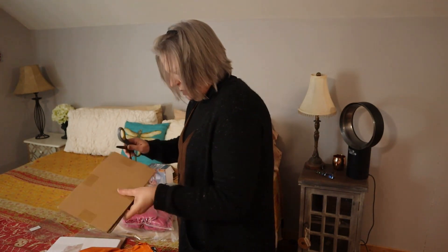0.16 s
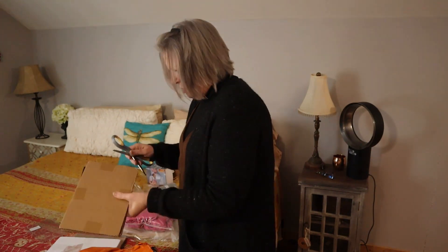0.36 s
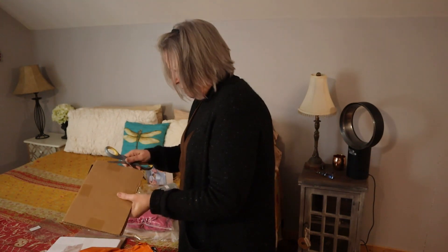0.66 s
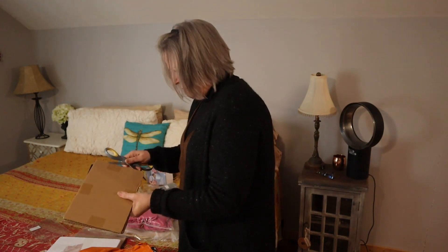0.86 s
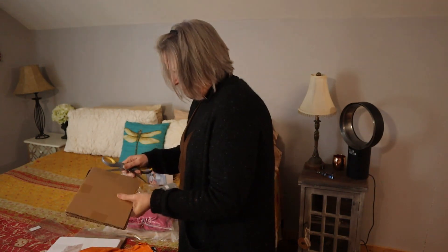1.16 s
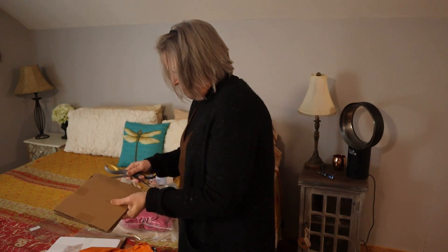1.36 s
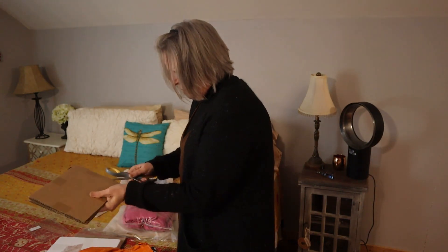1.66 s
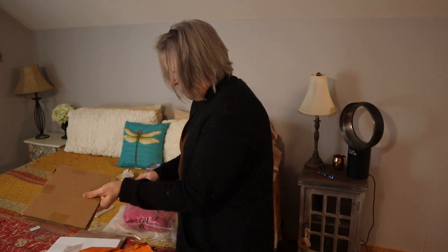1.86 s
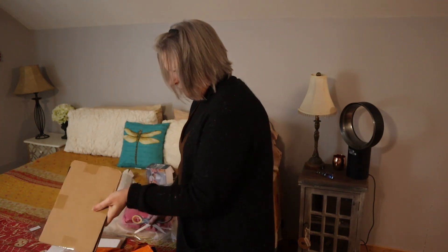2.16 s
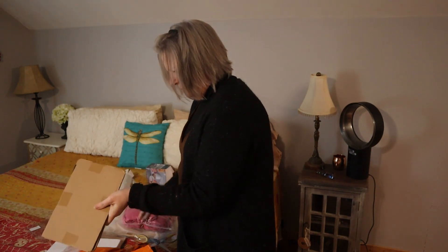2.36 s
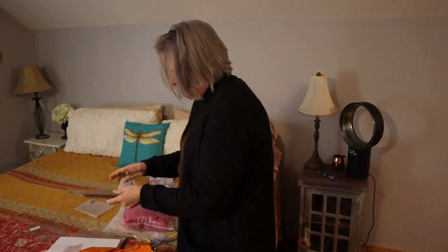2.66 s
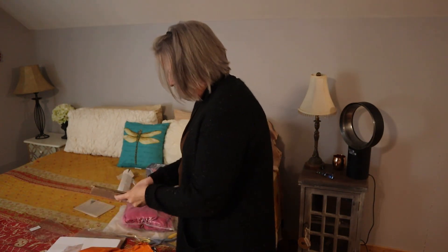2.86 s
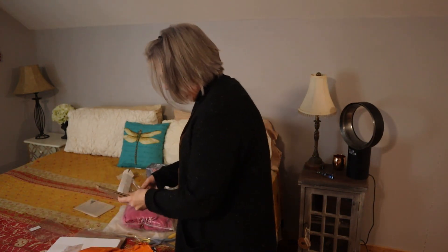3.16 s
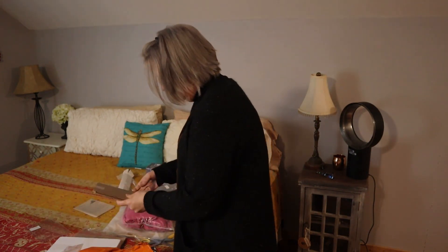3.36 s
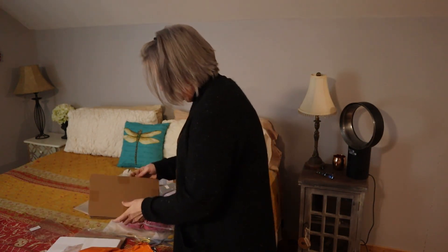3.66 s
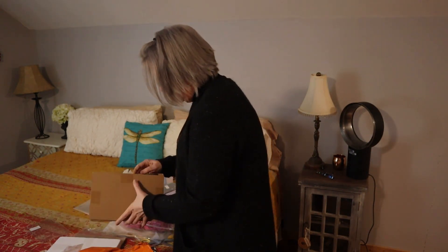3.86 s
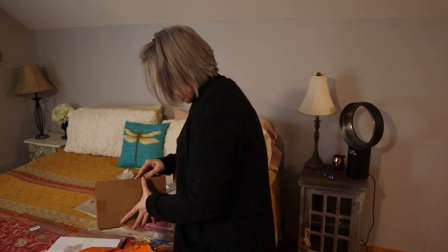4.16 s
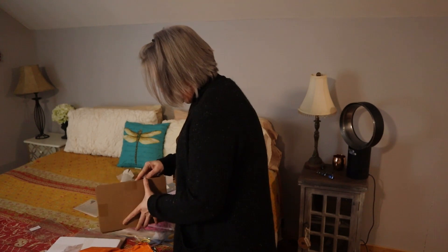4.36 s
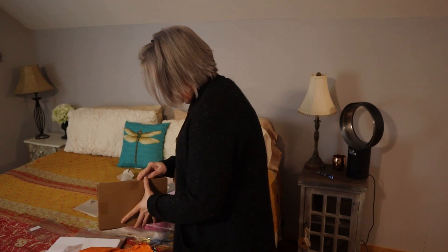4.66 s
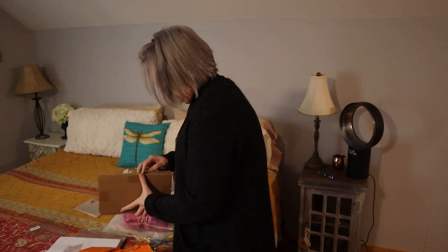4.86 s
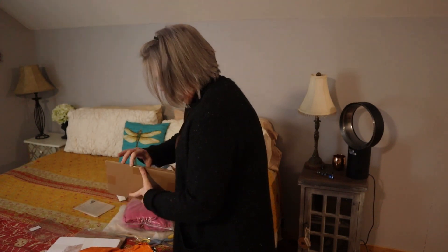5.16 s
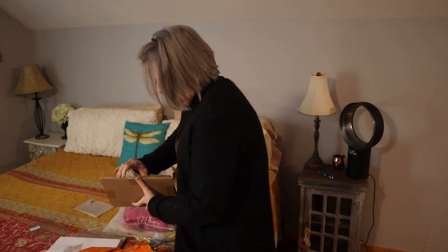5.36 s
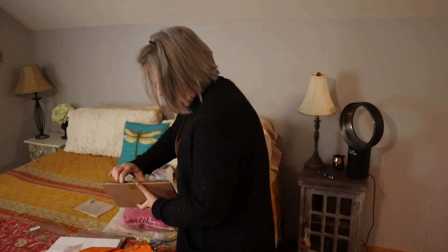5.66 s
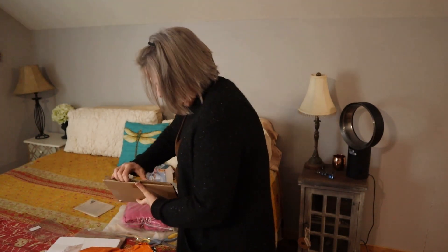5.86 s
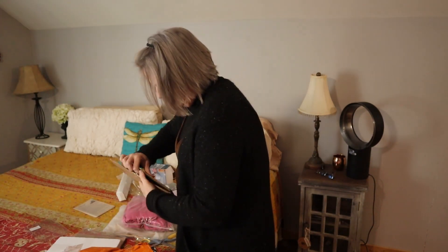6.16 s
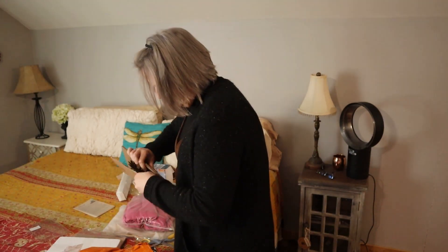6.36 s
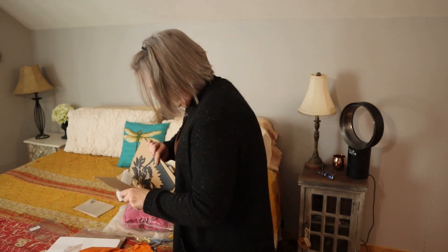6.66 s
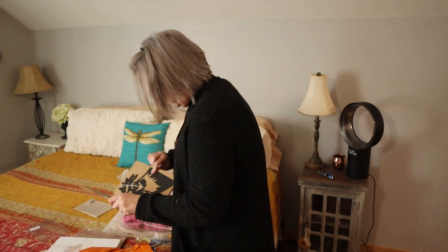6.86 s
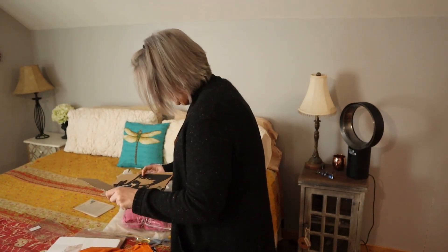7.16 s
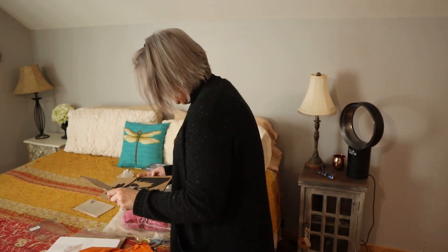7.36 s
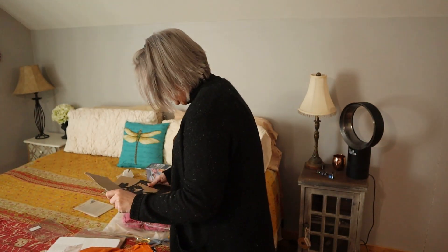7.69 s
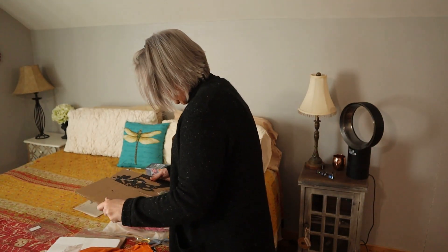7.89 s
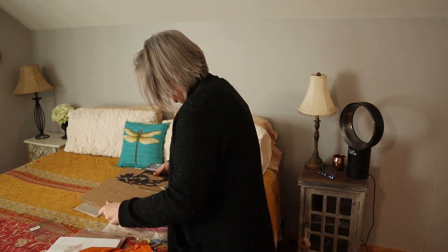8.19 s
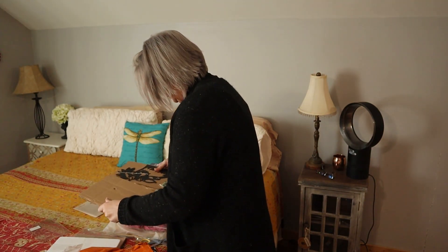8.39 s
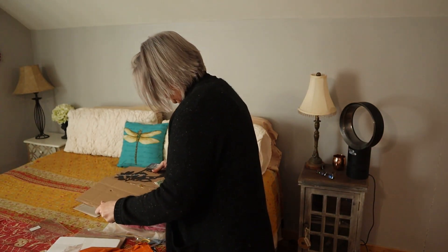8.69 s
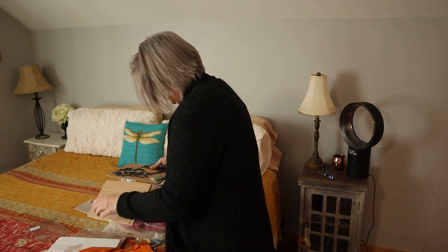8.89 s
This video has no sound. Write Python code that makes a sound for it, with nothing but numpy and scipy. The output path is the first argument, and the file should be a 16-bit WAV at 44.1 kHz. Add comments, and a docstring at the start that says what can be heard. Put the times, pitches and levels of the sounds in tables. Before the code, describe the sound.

Hands handle a flat cardboard mailer in a quiet bedroom, with faint rubbing, small crisp clicks and edge bumps, then two loud flap pops.

```python
"""In a bedroom, hands work at a flat cardboard mailer and open it.
Sliding hands hiss and set off small ticks, strokes rasp, fingertips skim in narrow bands, creases snap,
edges bump and drag, and two flaps pop open and rebound. Contacts are shaped noise; panels are ringing modes.
The room answers every contact over a quiet room tone; a camera with two close microphones limits the peaks."""
import sys
import numpy as np
from scipy import signal
from scipy.fft import rfft, irfft, next_fast_len
from scipy.io import wavfile
from scipy.ndimage import uniform_filter1d, map_coordinates

SR = 44100
rng = np.random.default_rng(int(sys.argv[2]) if len(sys.argv) > 2 else 0)


def generate_wav(signal):
    """Clip the signal to [-1, 1] and save it as 16-bit WAV at the path in sys.argv[1]."""
    frames = np.transpose(np.atleast_2d(signal))
    scaled = np.clip(frames, -1, 1) * 32767
    pcm = np.round(scaled).astype(np.int16)
    wavfile.write(sys.argv[1], SR, pcm)


N = 398223

# Every event level is set before its layer's trim, the room and the limiter.
# Room tone and microphone hiss, relative spectrum: [hz, density_db]
TONE_SPECTRUM = [(15, -25), (30, -6), (45, 2), (60, 0.5), (80, -5), (120, -3), (220, -5), (500, -6.5),
                 (1000, -12), (2000, -15), (4000, -17), (10000, -20), (16000, -23)]
# Left-right likeness of the room tone: [hz, correlation]
TONE_ALIKE = [(60, 1), (150, 0.77), (400, 0.38), (1000, 0.28), (4000, 0.34), (14000, 0.19)]
# Hands sliding over the board, swelling and easing off: [start_s, peak_s, end_s, peak_level_db]
SLIDE_EVENTS = [(0, 0.104, .42, -41), (1.25, 1.74, 1.95, -37), (3.2, 3.403, 4.1, -41.5),
                (3.64, 3.94, 4.08, -34.5), (4.83, 4.895, 5.35, -36), (5.43, 5.815, 6.53, -42),
                (6.1, 6.24, 6.56, -40.5), (7.22, 7.41, 7.48, -44), (7.7, 7.818, 8.43, -40),
                (8.82, 8.9, 8.9, -42)]
# Slide hiss from the skin of the board, relative spectrum: [hz, density_db]
HISS_SPECTRUM = [(500, -33), (1500, -18), (2500, -2.5), (4000, 3.5), (5500, 6.5), (7800, 4), (10000, 1),
                 (12500, -5.5), (16000, -4)]
# Slide rasp in the panel, relative spectrum: [hz, density_db]
RASP_SPECTRUM = [(100, -10), (280, -4.5), (450, 7.5), (750, 0), (1350, 5.5), (2200, 3.5), (4000, -8.5),
                 (9000, -51)]
# Short strokes of board on board or skin: [middle_s, length_s, level_db, body_re_rasp_db]
SCUFF_EVENTS = [(.132, 0.044, -42, -13), (.235, 0.041, -46, -10), (.323, 0.014, -33, -2),
                (.976, .014, -51.5, -7), (1.212, 0.0069, -25, -12), (1.321, 0.0077, -32, -18),
                (1.519, 0.012, -23.5, -1), (1.695, 0.0097, -23, -5.5), (1.79, 0.043, -23.5, -9),
                (2.518, 0.037, -29, 7.5), (3.44, 0.042, -36.5, -18), (3.515, 0.029, -32.5, -14),
                (3.694, 0.056, -33.5, -2), (3.752, 0.044, -32, -4.5), (4.49, 0.038, -42, -6),
                (4.941, 0.016, -34, -6), (5.341, 0.057, -36, 1), (5.753, 0.023, -34, -12),
                (5.921, 0.024, -31.5, -12), (6.125, 0.081, -34, 1), (6.615, 0.052, -17.5, 8),
                (6.672, 0.075, -19.5, 6), (6.786, 0.014, -30.5, 22), (6.86, 0.067, -37, 18),
                (6.925, 0.029, -18.5, -3), (7.009, 0.02, -31, -19), (7.681, 0.087, -38, -8),
                (7.86, 0.046, -43.5, 19), (7.991, 0.015, -39.5, 9), (8.108, 0.049, -34, -24),
                (8.447, 0.031, -27.5, -14), (8.556, 0.079, -32, -20), (8.872, 0.069, -32.5, -13)]
# Creases or fingernails snapping: [start_s, level_db, crack_hz, body_re_crack_db]
SNAP_EVENTS = [(.306, -35, 5370, -8), (1.9578, -38.5, 4420, -4), (2.8419, -41.5, 4900, -12),
               (3.0658, -44, 5200, -1), (3.2731, -29.5, 3800, -34), (3.3175, -22, 5740, -26),
               (3.4353, -25, 4470, -9.5), (4.0163, -28.5, 6000, -12), (4.0277, -29, 6360, -15),
               (4.1472, -37, 5570, -28), (4.2372, -25.5, 5500, -56), (4.8512, -34.5, 6750, -12),
               (4.936, -26, 5100, -11), (4.965, -24, 5400, -17), (5.043, -31, 6940, -7),
               (5.1144, -32, 6660, -28), (5.195, -33, 7840, -20), (5.2993, -30, 6030, -2),
               (5.3148, -19.5, 8100, -20), (5.335, -18.5, 7650, -5), (5.5858, -33.5, 5940, -23),
               (6.0576, -17.5, 6340, -12), (6.0637, -18.5, 7000, -3.5), (6.1142, -25, 4860, -19),
               (6.3986, -33.5, 5440, -7), (6.5178, -33, 6600, -32), (7.0107, -21.5, 5000, -26),
               (7.069, -37, 4320, -20), (7.12, -39, 7020, -32), (7.2314, -30.5, 4870, -31),
               (7.278, -36.5, 4430, -17), (7.329, -35, 5900, -20), (7.6646, -27.5, 5630, -27),
               (7.752, -30, 7500, -37), (7.7744, -29.5, 6640, -25), (7.7966, -23.5, 5800, -18),
               (7.9289, -32.5, 5800, -21), (8.0386, -31.5, 5170, -32), (8.2085, -35.5, 5550, -16),
               (8.3317, -38.5, 6760, -2), (8.868, -22.5, 6100, -16), (8.9226, -30.5, 4970, -6),
               (8.9897, -34.5, 6200, -5.5)]
# Edges that bump, ring the panel and drag on:
# [start_s, snap_db, body_re_crack_db, drag_db, drag_length_s, ring_db, best_excited_hz]
BUMP_EVENTS = [(1.5284, -20.5, -4, -27, .033, -19, 490), (1.6075, -17.5, -8.5, -18.5, .012, -17.5, 484),
               (1.735, -30, -7.5, -18, 0.022, -21, 525), (1.8115, -17, -8, -25.5, 0.014, -20, 1500),
               (2.431, -36, 5, -33, .016, -27, 140), (3.5346, -21, -4.5, -26.5, 0.008, -12.5, 1170),
               (7.817, -28, 4, -28, .028, -16, 327), (8.4634, -18, -8.5, -28, 0.024, -31.5, 192)]
# Soft pushes on a panel, without a snap: [start_s, level_db, best_excited_hz]
KNOCK_EVENTS = [(2.511, -30.5, 141), (3.695, -25, 1050), (3.753, -23.5, 1100), (7.798, -23.5, 380)]
# Ringing modes of the panel: [mode_hz, level_db, t60_s]
PANEL_MODES = [(72, -5, 0.071), (174.6, -1, 0.032), (245, -27, 0.054), (325.4, -0.5, 0.17),
               (388, -5.5, 0.15), (429, -4, 0.11), (446, 5, 0.091), (536, 7, 0.057), (560, 0, 0.069),
               (700, -6, 0.041), (899, 11, 0.053), (1048, 9, 0.07), (1182, -20, 0.03), (1420, -1, 0.07),
               (1407, 25, 0.024), (1940, -1, .06)]
# A fingertip or nail skimming the board: [middle_s, length_s, level_db, centre_hz]
SKIM_EVENTS = [(3.989, 0.056, -33.5, 6600), (4.063, 0.1, -32, 6900), (5.527, 0.052, -43.5, 4870),
               (5.706, 0.025, -41, 5100), (5.924, 0.018, -26.5, 6100), (7.382, 0.12, -46, 6980),
               (7.448, 0.043, -31.5, 7300), (7.991, 0.029, -33, 5370), (8.11, 0.039, -34, 7750)]
# Flaps popping open: [start_s, snap_db, body_re_crack_db, rebound_db, boom_db, boom_hz, thud_db]
FLAP_EVENTS = [(6.5726, 3.5, 6.5, 6.5, 3, 720, -21), (6.8687, -3, 7, -7, 5, 450, -6.5)]
# Left-right likeness of the room's diffuse tail: [hz, correlation]
ROOM_LIKENESS = [(100, 1), (400, 0.4), (1000, 0.19), (4000, 0.83), (12000, 0.12)]
# Decay of the diffuse tail: [hz, t60_s]
ROOM_DECAY = [(100, 0.21), (400, 0.28), (1000, 0.4), (3000, 0.37), (7000, .4), (14000, 0.18)]
# Tone colour of the whole room answer: [hz, gain_db]
ROOM_COLOUR = [(100, 4.5), (400, 1.5), (1000, 1.5), (3000, -0.5), (7000, -0.5), (11000, 5), (15000, 1.5)]
# Phase by which the left microphone is ahead of the right: [hz, phase_rad]
LEFT_LEAD = [(0, 1), (1400, 0.07), (3800, 1.13), (5200, 0.73), (7000, 1.08), (8600, 0.72), (11000, 4),
             (16000, 3.5)]

ROOM_TONE_DB = -49.5  # rms
RISE_DB, EASE_DB, SLIDE_FADE_S = 7.5, 8.5, 0.0033  # start and end under the peak; touch-down and lift-off fade
TICKS_PER_S, TICK_DB, TICK_SCATTER_DB = 4, 2, 4  # average rate; level re the slide's level; plus or minus
TICK_HZ, TICK_BODY_DB, TICK_TOP_DB = 5700, -15, -45  # crack centre; body re crack; loudest tick
RASP_HZ, RASP_SCATTER = 6370, 0.01  # crack centre of the strokes; relative change from stroke to stroke
MIDDLE_DB, MIDDLE_GROWS = -3.5, 0.45  # stiff middle re crack; how it follows the body (dB per dB)
BUMP_HZ = 5600  # crack centre
DRAG_BODY_DB, DRAG_PEAK = -0.5, .3  # drag body over snap body; peaks this share of its length after the bump
FLAP_HZ = 5200  # crack centre
REBOUND_S, REBOUND_HZ = .013, 5400  # delay; crack centre
REBOUND_BODY_DB, REBOUND_BOOM_DB = -2, -9  # body re crack; boom re the first boom
THUD_HZ = 172  # the whole box moves with the flap
ATTACK_S, TOP_HZ = .0015, 16000  # time constant of the limiter's ducking; upper band edge


def amp(db):
    """Decibels to gain."""
    return 10 ** (np.asarray(db) / 20)


def unit(x):
    """x at rms 1."""
    return x / np.sqrt(np.mean(x ** 2) + 1e-20)


def along(points, hz):
    """(Hz, value) points read on a log frequency axis."""
    f, v = np.transpose(points)
    return np.interp(np.log(hz + 1), np.log(f + 1), v)


def wobble(rate, n):
    """A smooth random curve, rate knots a second."""
    knots = rng.standard_normal(int(N * rate / SR) + 4)
    return map_coordinates(knots, [np.arange(n) * rate / SR])


def filtered(x, response):
    """x times a complex response of frequency, padded so that the ends stay apart."""
    n = x.shape[-1]
    m = next_fast_len(n + 8192)
    return irfft(rfft(x, m) * response(np.fft.rfftfreq(m, 1 / SR)), m)[..., :n]


def coloured(x, points, size=2048):
    """x through a causal minimum-phase filter with the given (Hz, dB) points."""
    cepstrum = irfft(np.log(amp(along(points, np.fft.rfftfreq(size, 1 / SR)))))
    # folding the cepstrum forward puts the energy as early as possible
    cepstrum[1:size // 2] *= 2
    cepstrum[size // 2 + 1:] = 0
    impulse = irfft(np.exp(rfft(cepstrum)))
    return signal.fftconvolve(x, impulse)[:len(x)]


def add(track, s, sound):
    """Mix a sound into a track from time s on."""
    i = max(0, round(s * SR))
    part = track[..., i:i + sound.shape[-1]]
    part += sound[..., :part.shape[-1]]


def noise_pair(n, alike):
    """Left and right noise with a likeness that depends on frequency, mixed from mid and side."""
    def balance(hz):
        turn = np.arccos(np.clip(along(alike, hz), -1, 1)) / 2
        return np.array([np.cos(turn), np.sin(turn)])

    mid, side = filtered(rng.standard_normal((2, n)), balance)
    return np.array([mid + side, mid - side])


def friction(n, rate, spread_db, smooth):
    """Fibres catch and let go: tiny slips of uneven size on a smooth hiss."""
    chance, size = rng.random(n), rng.exponential(size=n)
    sign, hiss = rng.choice([-1, 1], n), rng.standard_normal(n)
    slips = (chance < rate / SR) * sign * amp(spread_db * np.minimum(size, 4))
    return unit(unit(slips) + smooth * hiss)


def board(crack_hz, hollow_db):
    """Contact spectrum: crack of the paper skin over a hollow body and a stiff middle that grow together."""
    crack_hz = np.clip(crack_hz, 3200, 8000)
    middle_db = MIDDLE_DB + MIDDLE_GROWS * hollow_db
    bright_db = 14 * np.log2(crack_hz / 6000)  # a finer crack reaches further up
    body = [(40, hollow_db - 34), (130, hollow_db - 18), (220, hollow_db - 10),
            (340, hollow_db - 5), (680, hollow_db)]
    middle = [(1000, middle_db + .5), (2100, middle_db + .5)]
    crack = [(crack_hz * 0.82, .5), (crack_hz * 1.18, -.5)]
    top = [(9300, bright_db - 7), (12500, bright_db - 16), (16000, bright_db - 19)]
    return body + middle + crack + top


def uneven(points, depth_db, count=70):
    """Every spot of the board favours other frequencies: a spectrum with random humps."""
    hz = np.geomspace(40, 16000, count)
    return np.transpose([hz, along(points, hz) + depth_db * rng.standard_normal(count)])


def in_room(direct, radiated, wet_db, walls_db=-9, count=7):
    """Direct sound, plus what radiates all round and returns from near walls and as a diffuse tail."""
    n = SR // 2
    hz, t, z = signal.stft(noise_pair(n, ROOM_LIKENESS), SR, nperseg=256)
    decay = amp(-60 * t / along(ROOM_DECAY, hz)[:, None])
    tail = signal.istft(z * decay, SR, nperseg=256)[1][:, :n]
    tail *= 1 - np.exp(-(np.arange(n) / SR / 0.0007) ** 2)  # soft onset
    walls, strength = np.zeros((2, n)), rng.standard_normal(count)
    arrival = (rng.uniform(.005, .02, count) * SR).astype(int)
    slant = rng.integers(-3, 4, count)  # samples by which an echo differs between the microphones
    walls[0, arrival], walls[1, arrival + slant] = strength, strength
    answer = amp(wet_db) * tail / np.linalg.norm(tail[0])
    answer += amp(walls_db) * walls / np.linalg.norm(strength)
    answer = filtered(answer, lambda hz: amp(along(ROOM_COLOUR, hz)))
    out = signal.fftconvolve(radiated[None], answer, axes=1)
    add(out, 0, direct)
    return out


def room_tone():
    """Low steady rumble of the house under the microphones' own hiss, as coloured stereo noise."""
    noise = noise_pair(N, TONE_ALIKE)
    return amp(ROOM_TONE_DB) * unit(filtered(noise, lambda hz: amp(along(TONE_SPECTRUM, hz))))


def slide_db(t, start, peak, end, db):
    """Level of a slide at times t: it swells to its peak, then eases off."""
    return np.interp(t, [start, peak, end], [db - RISE_DB, db, db - EASE_DB])


def slides(hiss_db=-2, rasp_db=-14.0):
    """Skin and sleeves slide over the board: the same slips hiss on its skin and rasp in the panel."""
    out = np.zeros((2, N))
    for start, peak, end, db in SLIDE_EVENTS:
        t = start + np.arange(SR) / SR  # a slide lasts 1 s at most
        slips = friction(len(t), rate=300, spread_db=3.0, smooth=2.1)
        slips *= amp(1.5 * wobble(60.65, len(t)))
        hiss = amp(hiss_db) * unit(coloured(slips, uneven(HISS_SPECTRUM, depth_db=2.5)))
        rasp = amp(rasp_db) * unit(coloured(slips, uneven(RASP_SPECTRUM, depth_db=2.5)))
        touch = np.clip(np.minimum(t - start, end - t) / SLIDE_FADE_S, 0, 1)
        rub = touch * amp(slide_db(t, start, peak, end, db)) * (hiss + rasp)
        add(out, start, in_room(rub, rub, wet_db=-7.0))
    return out


def ticks(count=12):
    """Sliding fingers catch at random, harder the louder they rub, up to a ceiling."""
    cracks = []
    for start, peak, end, db in SLIDE_EVENTS:
        gap, strength = rng.random((count, 2)).T
        times = start + np.cumsum(.5 + gap) / TICKS_PER_S
        scatter_db = TICK_SCATTER_DB * (2 * strength - 1)
        levels = slide_db(times, start, peak, end, db) + TICK_DB + scatter_db
        for s, level in zip(times, levels):
            if s < end:
                cracks.append((s, min(level, TICK_TOP_DB), TICK_HZ, TICK_BODY_DB))
    return snaps(cracks)


def scuffs(rows, level_db=-1.5):
    """Each stroke swells and fades as the surfaces stick and slip."""
    out, t = np.zeros((2, N)), np.arange(SR // 4) / SR - 1 / 8  # t is zero mid-stroke
    for s, length, db, body_db in rows:
        pressure = np.exp(-np.abs(t / (0.6 * length)) ** 2.2) * amp(1.4 * wobble(220.2, len(t)))
        crack_hz = RASP_HZ * np.exp(RASP_SCATTER * rng.standard_normal())
        spot = uneven(board(crack_hz, body_db), depth_db=2)
        rasp = coloured(pressure * friction(len(t), rate=1400, spread_db=3.5, smooth=0.9), spot)
        # same energy as a steady sound of this level and length
        rasp *= amp(db + level_db) * np.sqrt(length * SR) / np.linalg.norm(rasp)
        add(out, s + t[0], in_room(rasp, rasp, wet_db=-5))
    return out


def snaps(rows, level_db=0, crumble=0.61, crumble_t60=0.053, bounce=0.99):
    """A crease gives way at once, fibres crumble after it, and a near surface throws the click back."""
    out, t = np.zeros((2, N)), np.arange(SR // 25) / SR
    kick = signal.unit_impulse(len(t))
    for s, db, crack_hz, body_db in rows:
        burst = 2 * kick + rng.standard_normal(len(t)) * amp(-60 * t / 0.0041)
        fibres = friction(len(t), rate=3300, spread_db=-0.5, smooth=0.35)
        burst += crumble * fibres * amp(-60 * t / crumble_t60)
        echo = kick + rng.standard_normal(len(t)) * amp(-60 * t / 0.0045)
        add(burst, rng.uniform(.0019, .0027), bounce * echo)
        spot = uneven(board(crack_hz, body_db), depth_db=2)
        # summed over all directions the snap has a smoother spectrum than along one
        clicks = [coloured(push, spot) for push in (burst, kick)]
        size = amp(db + level_db) * np.sqrt(.006 * SR)  # energy of 6 ms at this rms level
        direct, radiated = [size * click / np.linalg.norm(click) for click in clicks]
        add(out, s, in_room(direct, radiated, wet_db=-4.5))
    return out


def bumps():
    """Each bump of an edge is a snap, a ring of the panel and a short drag."""
    cracks, drags, blows = [], [], []
    for s, snap_db, body_db, drag_db, length, ring_db, ring_hz in BUMP_EVENTS:
        cracks.append((s, snap_db, BUMP_HZ, body_db))
        drags.append((s + DRAG_PEAK * length, length, drag_db, body_db + DRAG_BODY_DB))
        blows.append((s, ring_db, ring_hz))
    return snaps(cracks) + scuffs(drags) + knocks(blows)


def knocks(rows, level_db=0, attack=0.00038, selective_db=15, waver=0.81):
    """A bumped panel rings in the modes that suit the softness of the blow."""
    out, t = np.zeros((2, N)), np.arange(SR // 5) / SR
    hz, mode_db, t60 = np.transpose(PANEL_MODES)[:, :, None]
    for s, db, best_hz in rows:
        share = amp(mode_db - selective_db * np.log2(hz / best_hz) ** 2)
        # the flexing board never holds a pitch: each mode's phase drifts (radians)
        drift = waver * np.array([wobble(f / 8, len(t)) for f in hz[:, 0]])
        side = rng.choice([-1, 1], hz.shape)  # each mode starts towards or away from the listener
        modes = side * share * amp(-60 * t / t60) * np.sin(2 * np.pi * hz * t + drift)
        ring = np.sum(modes, axis=0) / share.sum()
        ring *= amp(db + level_db) * (1 - np.exp(-t / attack))
        add(out, s, in_room(ring, ring, wet_db=-4))
    return out


def skims(level_db=-2, width=0.18, flutter_db=3.0):
    """Fine paper grain passes under a fingertip at a steady speed, so the hiss has a pitch."""
    out, t = np.zeros((2, N)), np.arange(SR // 4) / SR - 1 / 8  # t is zero mid-skim
    for s, length, db, centre_hz in SKIM_EVENTS:
        grain = rng.standard_normal(len(t))
        band = unit(filtered(grain, lambda hz: 1 / (1 + ((hz / centre_hz - 1) / width) ** 4)))
        swell = np.exp(-(t / (0.47 * length)) ** 2)
        skim = band * swell * amp(db + level_db + flutter_db * wobble(133, len(t)))
        add(out, s + t[0], in_room(skim, skim, wet_db=-9.5))
    return out


def flaps():
    """Each flap snaps free, sets the panel booming and the box thudding, then strikes again as it rebounds."""
    cracks, blows = [], []
    for s, snap_db, body_db, rebound_db, boom_db, boom_hz, thud_db in FLAP_EVENTS:
        rebound_s = s + REBOUND_S
        cracks += [(s, snap_db, FLAP_HZ, body_db), (rebound_s, rebound_db, REBOUND_HZ, REBOUND_BODY_DB)]
        blows += [(s, boom_db, boom_hz), (s, thud_db, THUD_HZ)]
        blows.append((rebound_s, boom_db + REBOUND_BOOM_DB, boom_hz))
    return snaps(cracks) + knocks(blows)


def scene():
    """All contacts come from a box a little to the left of the microphones, over the room tone."""
    quiet = room_tone()
    box = slides() + ticks() + scuffs(SCUFF_EVENTS) + snaps(SNAP_EVENTS)
    box += bumps() + knocks(KNOCK_EVENTS) + skims() + flaps()
    # half the lead goes to each side, left ahead and right behind
    box = filtered(box, lambda hz: np.exp(.5j * along(LEFT_LEAD, hz) * np.array([[1], [-1]])))
    return box * amp([[.2], [-.2]]) + quiet


def record(dry, threshold_db=-11, release=0.092, low_cut_hz=45):
    """The camera ducks loud sounds and recovers slowly; what slips through is clipped and band-limited."""
    t = np.arange(N) / SR
    power = np.abs(uniform_filter1d(np.mean(dry ** 2, axis=0), size=88))  # 2 ms window
    over_db = np.maximum(10 * np.log10(power + 1e-12) - threshold_db, 1e-6)
    # the running maximum holds each peak while it decays with the release time constant
    duck_db = np.exp(np.maximum.accumulate(np.log(over_db) + t / release) - t / release)
    keep = np.exp(-1 / (ATTACK_S * SR))
    smooth_duck_db = signal.lfilter([1 - keep], [1, -keep], duck_db)
    limited = np.clip(dry * amp(-smooth_duck_db), -1, 1)
    low_cut = signal.butter(2, low_cut_hz, "highpass", fs=SR, output="sos")
    limited = signal.sosfilt(low_cut, limited)
    return filtered(limited, lambda hz: 1 / (1 + (hz / TOP_HZ) ** 120))


dry = scene()
out = record(dry)
generate_wav(out)
```